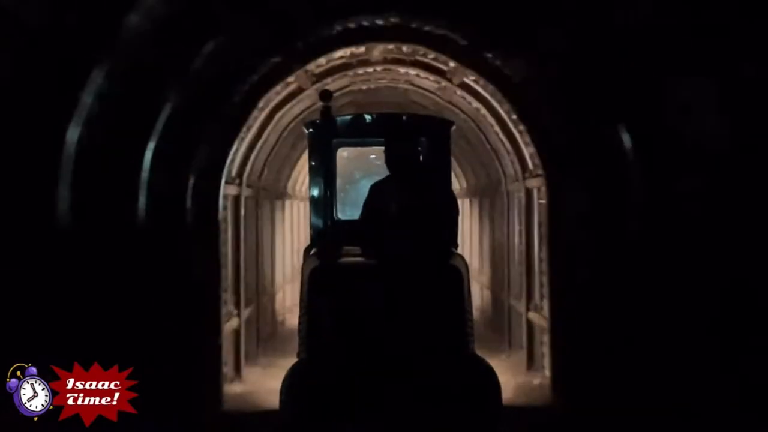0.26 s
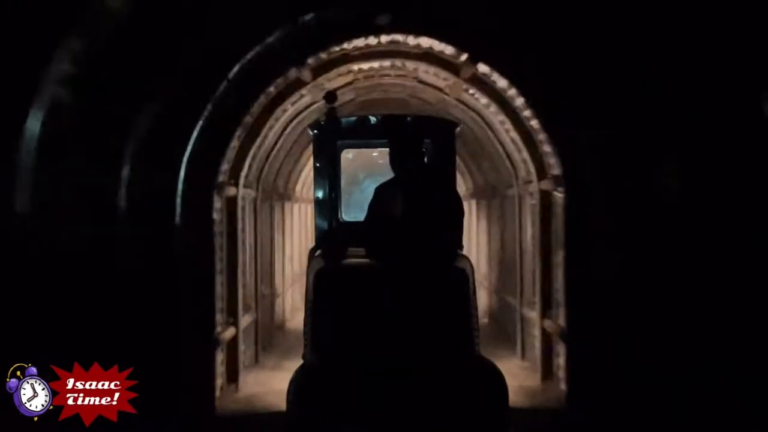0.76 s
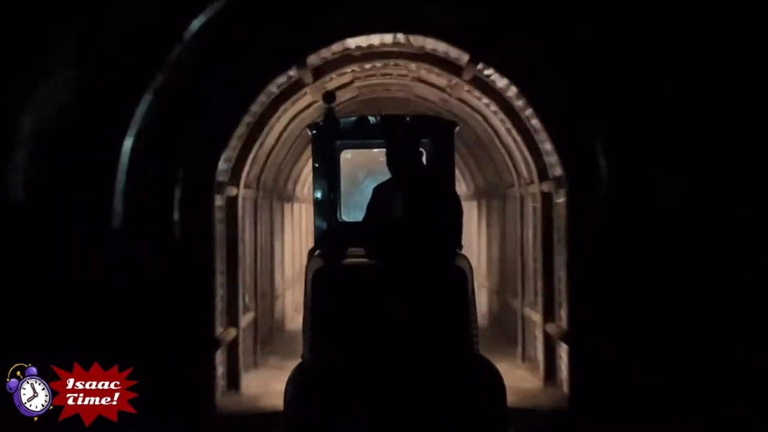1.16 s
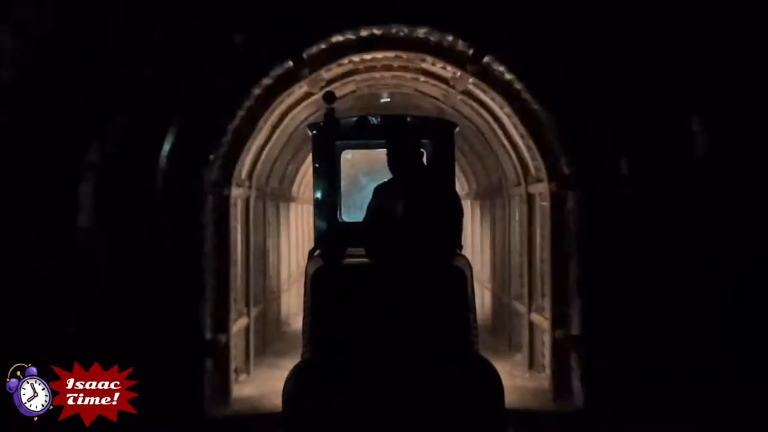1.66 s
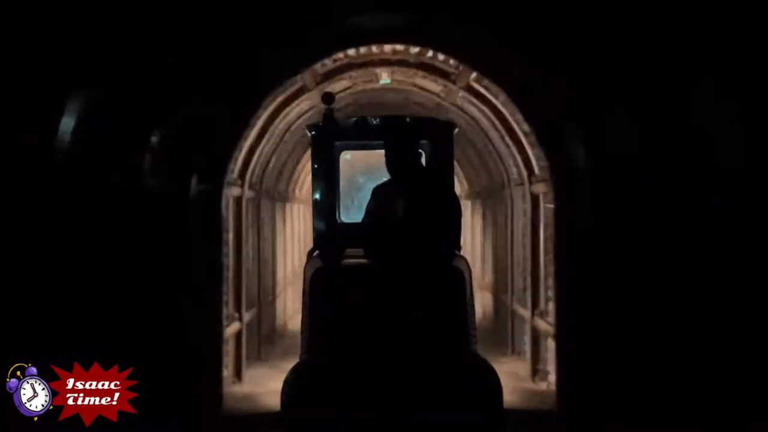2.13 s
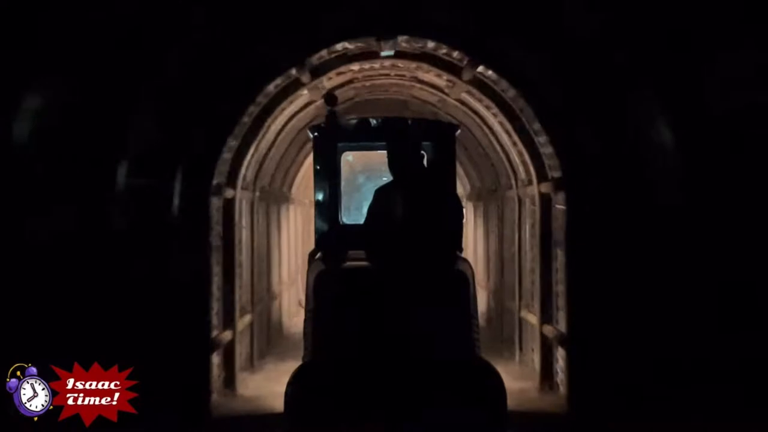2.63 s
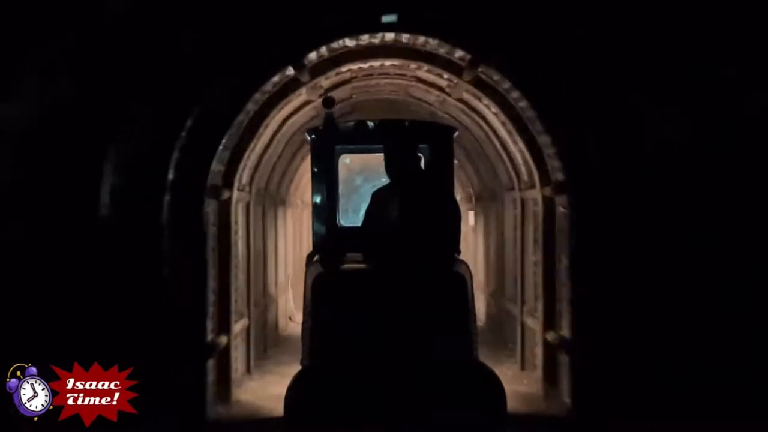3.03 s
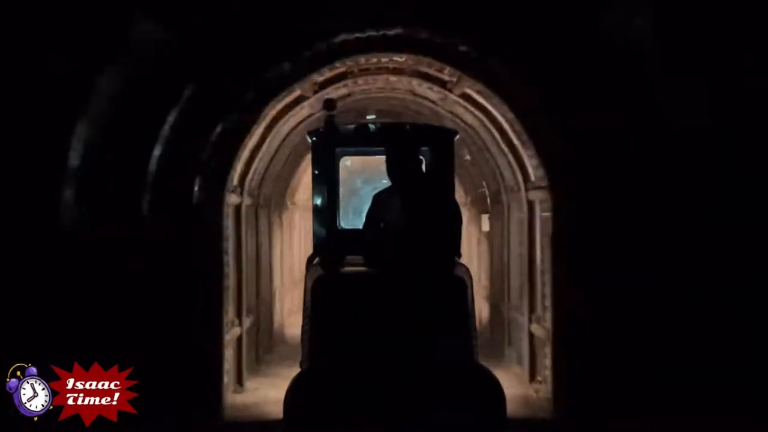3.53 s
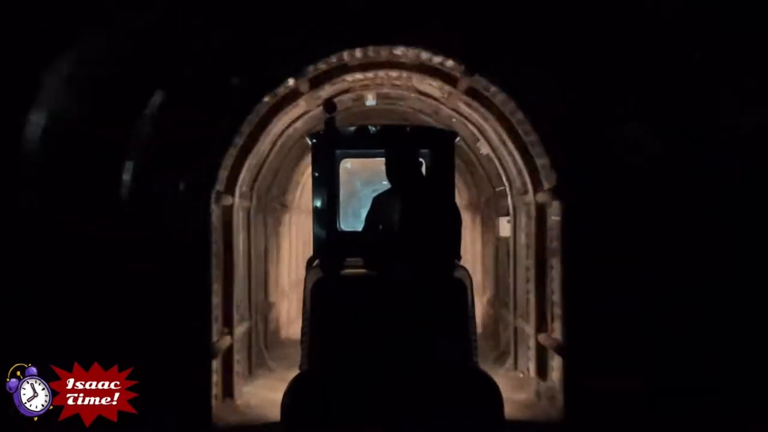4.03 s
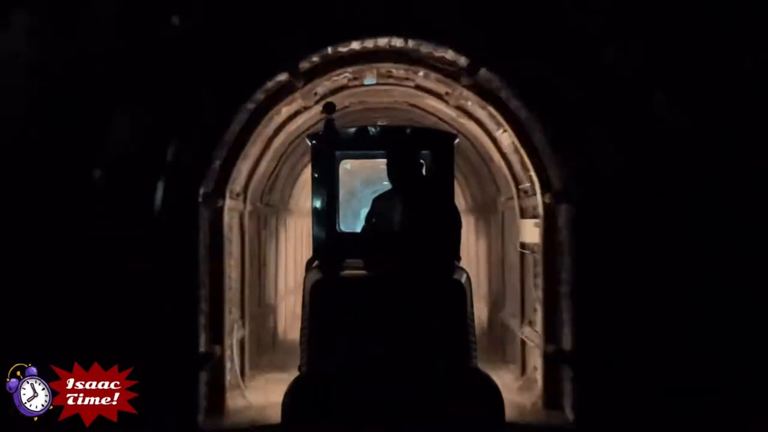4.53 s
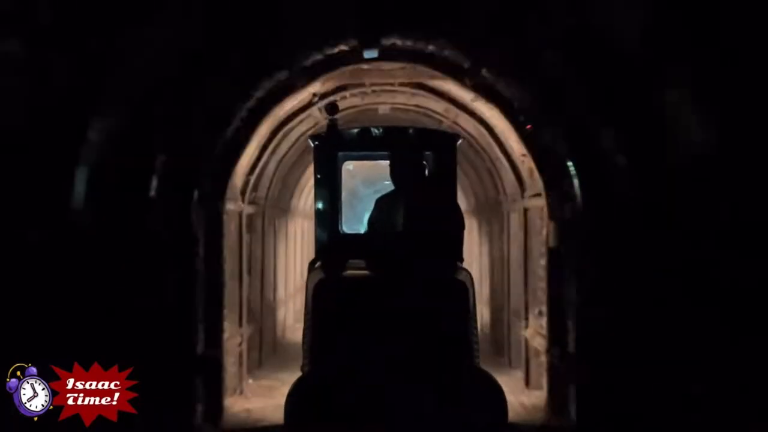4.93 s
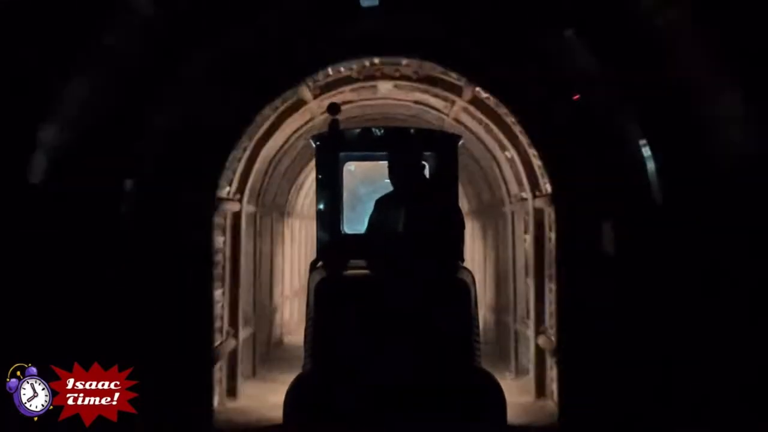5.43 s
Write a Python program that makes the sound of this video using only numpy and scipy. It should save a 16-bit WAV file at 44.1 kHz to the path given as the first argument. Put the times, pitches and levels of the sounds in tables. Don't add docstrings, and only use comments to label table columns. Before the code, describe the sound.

A continuous rumble of wagon wheels on rough rail fills a tight tunnel, with a small diesel booming and fading underneath. Clanking joint blows come in quick pairs, some ringing, others dry cracks, with low body jolts. Faint thin squeals flick by early; a stronger one comes midway, then a short loud creak after four seconds. The close onboard stereo microphone overloads slightly on the hardest hits.

```python
import sys
import numpy as np
from scipy import signal
from scipy.fft import rfft, irfft, next_fast_len
from scipy.io import wavfile
from scipy.ndimage import uniform_filter1d

SR = 44100
rng = np.random.default_rng(int(sys.argv[2]) if len(sys.argv) > 2 else 0)


def invert_db(level):
    return 10 ** (np.asarray(level, dtype=float) / 20)


def inscribe(sig):
    pcm = np.round(np.clip(np.atleast_2d(sig).T, -1, 1) * 32767)
    wavfile.write(sys.argv[1], SR, pcm.astype(np.int16))


N = 250929
TIME = np.arange(N) / SR
SIZE = next_fast_len(N)
HZ = np.maximum(np.arange(SIZE // 2 + 1) * SR / SIZE, 1)


def over_hz(table, column):
    table = np.array(table)
    return np.interp(np.log(HZ), np.log(table[:, 0]), table[:, column])


def shape(x, gain):
    return irfft(rfft(x, SIZE) * gain, SIZE)[..., :N]


def walk(rate):
    hold = max(int(SR / 32 / rate), 1)
    steps = np.repeat(rng.standard_normal(N // 32 // hold + 2), hold)
    smooth = uniform_filter1d(uniform_filter1d(steps, hold), hold)
    return 1.3 * np.interp(np.arange(N) / 32, np.arange(len(smooth)), smooth)


def engine():
    # multiple of the cycle rate, level/dB
    exhaust = [
        (3, -37),
        (4, -58),
        (5, -60),
        (6, -30.5),
        (7, -45),
        (8, -38),
        (9, -36),
        (11, -36),
        (15, -43.5),
        (27, -40.5),
    ]
    cycle_hz = 8.473
    turn = 2 * np.pi * cycle_hz * (TIME - .05 + 0.0016 * walk(3.0))
    out = invert_db(boom(multiple=10) - 4.0) * np.cos(10 * turn + 1.4)
    out = out + invert_db(boom(multiple=12) - 5.5) * np.cos(12 * turn + 2.8)
    for multiple, db in exhaust:
        waver_db = 0.15 * min(multiple, 12) * walk(7.0)
        pipe_delay = .12 * multiple ** 2
        out = out + invert_db(db + waver_db) * np.cos(multiple * turn + pipe_delay)
    return np.sqrt(2) * out


def boom(multiple):
    # start t/s, length/s, multiple of the cycle rate, level/dB
    booms = [(.05, .3, 10, -23.5), (.5, .1, 12, -17), (1.043, .6, 10, -21), (1.05, 0.32, 12, -21.5),
             (1.793, .02, 12, -19), (2.11, .24, 12, -20), (2.25, 0.5, 10, -27), (2.8, .12, 12, -22),
             (2.876, 0.38, 10, -19.5), (3.2, .03, 12, -21.5), (3.62, 0.26, 12, -20), (3.99, .12, 10, -13.5),
             (4.097, .03, 12, -29), (4.32, .02, 10, -28), (4.313, .03, 12, -18), (4.6, .05, 10, -17),
             (4.58, 0.13, 12, -19), (4.958, 0.018, 10, -18), (5.19, 0.15, 10, -14.5), (5.5, .05, 12, -32)]
    floor_db, rise_db_per_s, fall_db_per_s = -26, 130, 154
    db = np.full(N, float(floor_db))
    for s, length, caught, top_db in booms:
        if round(caught) == multiple:
            before = np.maximum(s - TIME, 0)
            after = np.maximum(TIME - s - length, 0)
            db = np.maximum(db, top_db - rise_db_per_s * before - fall_db_per_s * after)
    return db


def rolling():
    # t/s, level/dB
    roar = [(0.0, -19.5), (0.73, -18.5), (1.25, -20.5), (1.6, -18), (2.14, -20), (2.8, -16), (3.35, -20),
            (4.1, -17.5), (4.45, -20), (4.83, -17.5), (5.69, -21)]
    # f/Hz, level/dB per Hz
    rail_colour = [(42, -8), (92, -5), (145, -2.5), (183, -8), (222, -2.5), (310, -10.5), (420, -7),
                   (980, -12.5), (1330, -14), (1800, -19), (3970, -23.5), (5600, -33.5), (8500, -32.5),
                   (14300, -40.5)]
    s, roar_db = np.transpose(roar)
    hiss_db = (-26 - roar_db) * (1 - 0.55)
    rumble_db = (-20.5 - roar_db) * (1 - 0.82)
    grit = invert_db(1.5 * rng.exponential(size=(2, N))) * rng.standard_normal((2, N))
    field = rfft(grit, SIZE) * invert_db(over_hz(rail_colour, 1))
    field = field / np.std(irfft(field * (HZ > 300) * (HZ < 3000), SIZE))
    out, shudder = 0, .6 * walk(20.0)
    for octave in np.arange(4.5, 14.5, .5):
        band = np.cos(np.pi * np.clip(np.log2(HZ) - octave, -.5, .5)) ** 2
        hiss_share, rumble_share = np.clip((octave - 11) / 2, 0, 1), np.clip(9 - octave, 0, 1)
        level = np.interp(TIME, s, roar_db + hiss_db * hiss_share + rumble_db * rumble_share)
        flicker = 1.75 * walk(12.0)
        out = out + invert_db(level + shudder + flicker) * irfft(field * band, SIZE)[:, :N]
    return out


def joints():
    # t/s, blow level/dB, ring f/Hz, ring above blow/dB, # rattle above
    # blow/dB
    own_pitch = [(0.1895, -13.5, 469, 8, -29), (0.319, -13, 516, 6.5, -27), (0.4374, -23, 523, 18.5, -25),
                 (0.574, -12.5, 480, 6.5, -21), (0.7981, -12.5, 568, 6.5, -28), (0.8125, -23, 570, 12, -24),
                 (0.9258, -11, 490, 10, -33), (0.9572, -27, 677, 21.5, -32), (1.3997, -9, 410, 10, -37),
                 (1.5262, -8.5, 470, 13.5, -40), (1.763, -11, 402, 14.5, -32), (1.8947, -9, 447, 6, -18),
                 (2.7495, -9, 512, 0, -37), (3.1066, -8, 489, 2, -34), (3.5797, -6, 402, 9, -17),
                 (3.709, -4.5, 373, 4, -27), (3.9493, -5, 388, 8, -20), (4.0791, -5.5, 484, -1, -16),
                 (4.561, -9, 490, 5.5, -21), (4.693, -7.5, 440, -1, -29), (4.793, -8, 490, 7.5, -13),
                 (5.164, -13.5, 416, 8, -7), (5.184, -15, 396, 12.5, -15), (5.2921, -7, 494, 6.5, -13)]
    # t/s, blow level/dB, rattle above blow/dB
    common_pitch = [(0.845, -22, -21), (1.9542, -15, -31), (1.9797, -18.5, -28), (2.101, -11.5, -33),
                    (2.379, -10, -29), (2.508, -11, -35), (2.6074, -12.5, -22), (2.7782, -19, -31),
                    (2.979, -8.5, -28), (4.135, -11, -20), (4.2825, -10.5, -28), (4.92, -15, -12),
                    (4.939, -6, -12.5), (5.028, -12, -22)]
    # f/Hz, level/dB per Hz
    blow_colour = [(90, -27), (180, -6), (520, 3), (950, -4), (1330, -0.5), (1900, -6.5), (3200, -8),
                   (5500, -22), (8600, -25.5), (13000, -31.5), (15500, -51)]
    common_ring_hz, common_ring_db, rail_ring_hz = 504, -1.5, 861.5
    drop_s, wheel_fall_s, rail_fall_s, rattle_fall_s = .003, .02, .016, .024
    colour = invert_db(over_hz(blow_colour, 1))
    low = 1 / (1 + (HZ / 1500) ** 6)
    loose = 1 / (1 + (7500 / HZ) ** 8) / (1 + (HZ / 14500) ** 8)
    chatter = invert_db(2.6 * walk(300.0))
    gains = np.array([colour * low, colour * (1 - low), loose])
    rail, wheel, fittings = chatter * shape(rng.standard_normal((3, N)), gains)
    out, t = np.zeros((2, N)), np.arange(SR // 3) / SR
    common_pitch_blows = [(s, db, common_ring_hz, common_ring_db, rattle_db) for s, db, rattle_db in common_pitch]
    for s, db, hz, ring_db, rattle_db in list(own_pitch) + common_pitch_blows:
        start = int(s * SR) - 90
        now = slice(start, start + len(t))
        blow = invert_db(-6.5) * burst(wheel[now], drop_s, wheel_fall_s)
        knock = invert_db(-3 + 0.13 * ring_db) * burst(rail[now], drop_s, rail_fall_s)
        rattle = invert_db(rattle_db - 9.5) * burst(fittings[now], drop_s, rattle_fall_s)
        turn = 2 * np.pi * t
        tones = np.sin(turn * hz) + 0.25 * np.sin(turn * 0.795 * hz) + 0.31 * np.sin(turn * 1.3 * hz)
        tones = tones + 0.2 * np.sin(turn * rail_ring_hz)
        swell = (1 - np.exp(-t / .0045)) * np.exp(-t / 0.011)
        ring = invert_db(ring_db - 1.0) * swell * tones * np.sqrt(chatter[now])
        dry_ring = ring * np.array([[.7], [.5]])
        out[:, now] += invert_db(db) * (tunnel(blow + knock + rattle + 0.29 * ring) + dry_ring)
    return out


def burst(grit, rise_s, fall_s):
    t = np.arange(len(grit)) / SR
    push = (1 - np.exp(-t / rise_s)) * np.exp(-t / fall_s)
    return push * grit * np.sqrt(np.sum(push ** 2) / np.sum((push * grit) ** 2))


def tunnel(x):
    t60_s, top_t60_s, echo_db = .26, .3, -2.5
    t = np.arange(SR // 3) / SR
    echoes = rng.standard_normal((2, len(t)))
    low = signal.lfilter([.2], [1, -.8], echoes)
    tail = low * invert_db(-60 * t / t60_s) + .5 * (echoes - low) * invert_db(-60 * t / top_t60_s)
    tail = invert_db(echo_db) * tail / np.sqrt(np.sum(tail ** 2) / 2)
    tail[:, 0] += [1.05, .95]
    return signal.fftconvolve(x[None], tail, axes=1)[:, :len(x)]


def squeals():
    # start t/s, length/s, start f/Hz, end f/Hz, level/dB
    rubs = [
        (.5, 0.067, 11000, 11400, -41),
        (0.624, 0.07, 11200, 11400, -35),
        (.83, .06, 11400, 11400, -42),
        (2.547, 0.089, 10600, 10750, -31),
        (2.6, 0.096, 8800, 10800, -40),
        (4.186, 0.089, 11400, 11400, -38),
        (2.9, 0.15, 740, 660, -20),
        (2.5, .11, 1100, 1500, -29),
        (4.137, 0.059, 680, 725, -13),
    ]
    out = np.zeros(N)
    for s, length, hz0, hz1, db in rubs:
        part = np.clip((TIME - s) / length, 0, 1)
        hz = hz0 + (hz1 - hz0) * part + .007 * hz0 * walk(400.0)
        level = invert_db(db + 3.1 * walk(150.0))
        swell = np.sqrt(np.abs(np.sin(np.pi * part))) * (part > 0) * (part < 1)
        out += level * swell * np.sin(2 * np.pi * np.cumsum(hz) / SR)
    return out


def thumps():
    # t/s, level/dB, f/Hz
    jolts = [(0.027, -11, 94.2), (0.194, -2.5, 150), (0.431, 1.5, 101), (1.076, -8, 88.8),
             (1.271, -22, 88.5), (1.382, -3, 88), (1.616, -5, 95.5), (1.965, -12, 72.7), (2.097, 1, 92),
             (2.754, -2, 85.5), (3.277, -14, 82), (3.388, -12, 216), (3.517, -2, 86.1), (3.963, -5, 76),
             (4.142, -1, 106.4), (4.306, -1, 91), (4.694, -8, 89), (4.793, 0.5, 95), (4.933, 4.5, 84),
             (5.52, -8, 90)]
    out, t = np.zeros(N + SR), np.arange(SR // 8) / SR
    swell = (1 - np.exp(-t / 0.0043)) * np.exp(-t / 0.039)
    for s, db, hz in jolts:
        start = int(s * SR)
        out[start:start + len(t)] += invert_db(db - 10.0) * swell * np.sin(2 * np.pi * hz * t)
    return out[:N]


def plates():
    # f/Hz, width of the resonance/Hz, level/dB
    loose_plates = [
        (388, 21, -34.5),
        (490, 9.5, -35.5),
        (690.4, 11, -34),
        (827, 52, -35.5),
        (1324, 14, -36.5),
        (1863, 18, -37.5),
        (2680, 37, -50),
        (3160, 31, -46),
    ]
    out = 0
    for hz, width_hz, db in loose_plates:
        jolts = (rng.random((2, N)) < 30 / SR) * rng.standard_normal((2, N))
        ring = rfft(jolts, SIZE) / (1 + 1j * (HZ / hz - hz / HZ) * hz / width_hz)
        out = out + invert_db(db) * ring / np.sqrt(np.sum(np.abs(ring) ** 2)) * SIZE
    return irfft(out, SIZE)[:, :N]


def scene():
    # f/Hz, likeness 0-1, right leads left/radians, left above right/dB
    stereo = [(60, .955, 0, 2.2), (200, .96, 0, 2.2), (330, .5, 1.0, 2.4), (500, .15, 1.5, 2.4),
              (900, .27, 2.7, 2.3), (1800, .12, 1.5, 1.6), (2600, .25, -1.3, 1.3), (4500, .3, -1.1, 2.5),
              (5400, .2, -1.0, 3.0), (7000, .3, 1.8, .5), (7900, .86, 3.0, 0), (8700, .93, np.pi, 0),
              (9500, .85, 3.4, 0), (11500, .45, 4.5, 0), (11900, .97, 2 * np.pi, 0)]
    both = rolling() + plates() + joints() + squeals() * np.array([[1], [.3]])
    first, second = both + (engine() + thumps()) * np.array([[1], [0]])
    alike, tilt = np.clip(over_hz(stereo, 1), 0, 1), invert_db(over_hz(stereo, 3) / 2)
    left = shape(first, tilt)
    shared = shape(first, alike * np.exp(1j * over_hz(stereo, 2)) / tilt)
    right = shared + shape(second, np.sqrt(1 - alike ** 2) / tilt)
    return np.array([left, right])


def top_cut(x):
    return signal.sosfilt(signal.butter(12, 15610, fs=SR, output="sos"), x)


def record(dry):
    heard = shape(dry, 1 / (1 + (HZ / 15250) ** 40) / (1 + (35 / HZ) ** 5))
    return top_cut(np.clip(heard, -1, 1))


dry = scene()
out = record(dry)
inscribe(out)
```